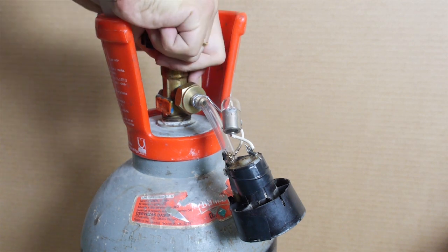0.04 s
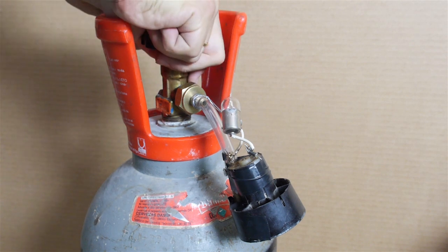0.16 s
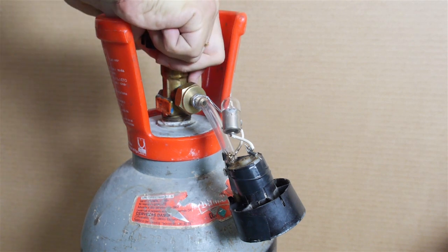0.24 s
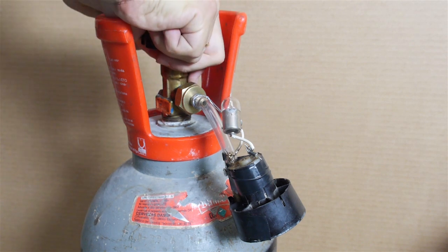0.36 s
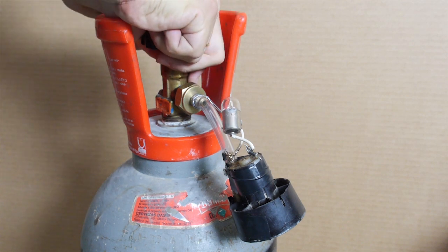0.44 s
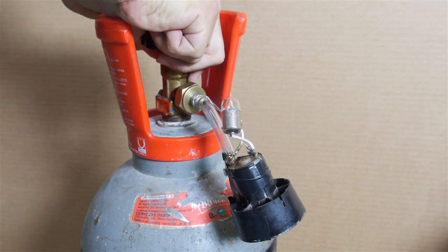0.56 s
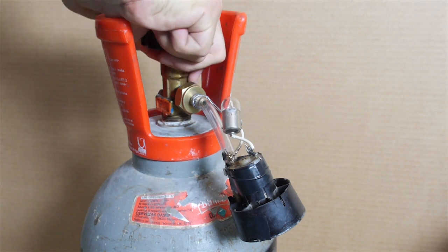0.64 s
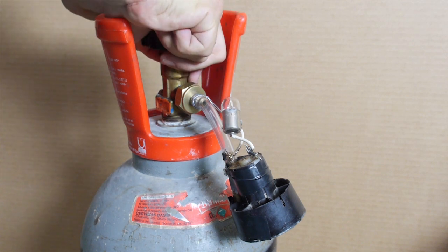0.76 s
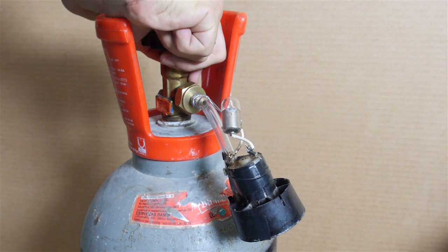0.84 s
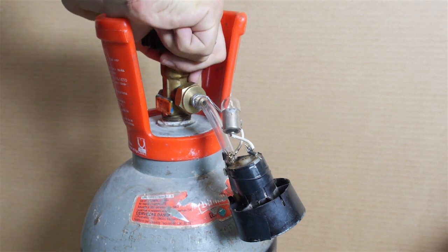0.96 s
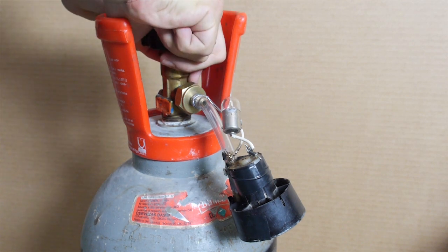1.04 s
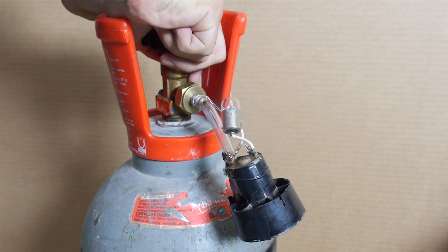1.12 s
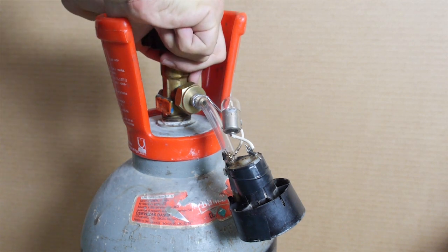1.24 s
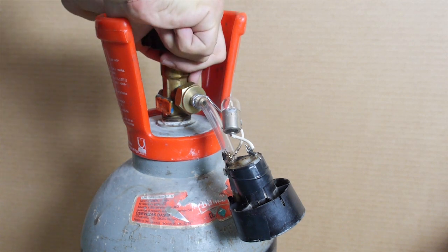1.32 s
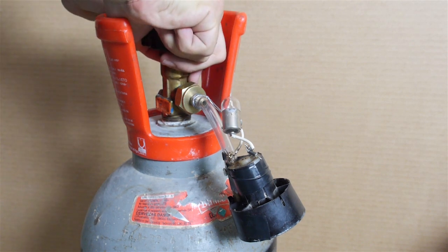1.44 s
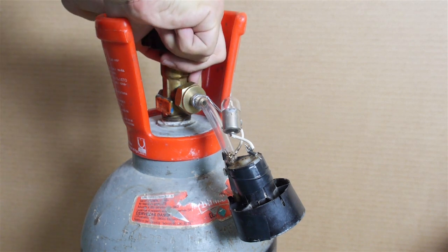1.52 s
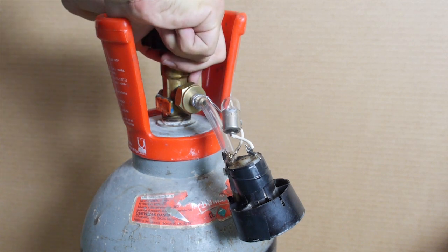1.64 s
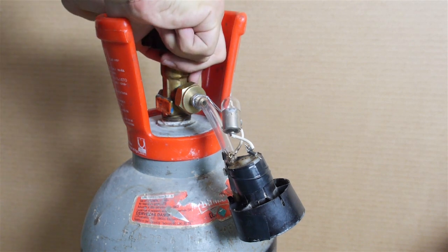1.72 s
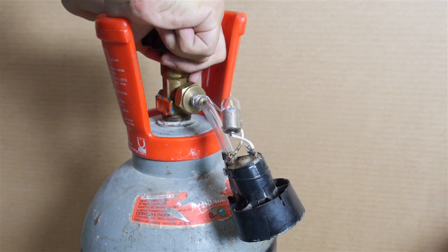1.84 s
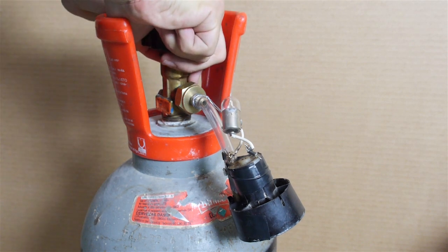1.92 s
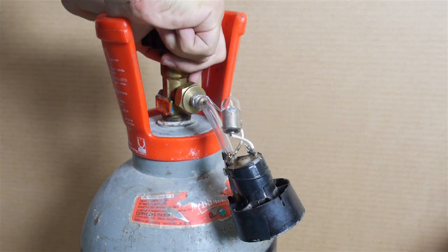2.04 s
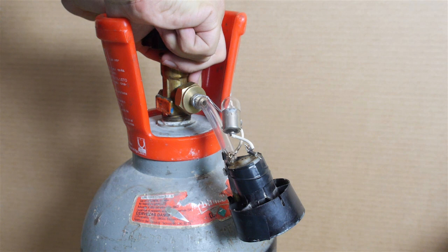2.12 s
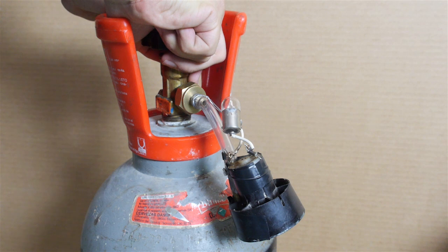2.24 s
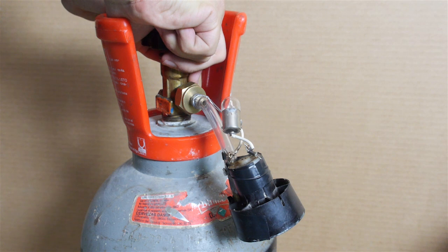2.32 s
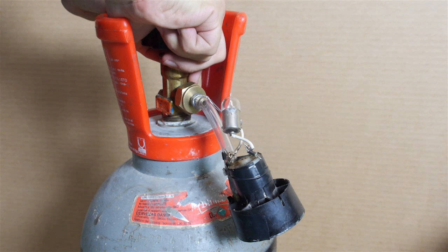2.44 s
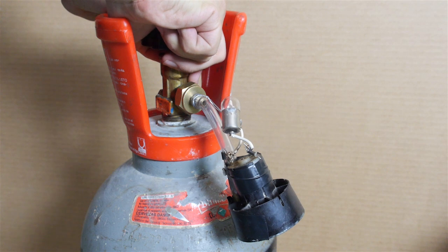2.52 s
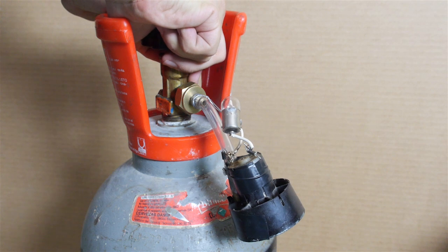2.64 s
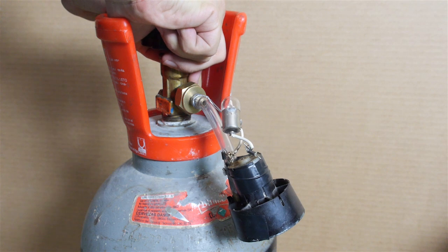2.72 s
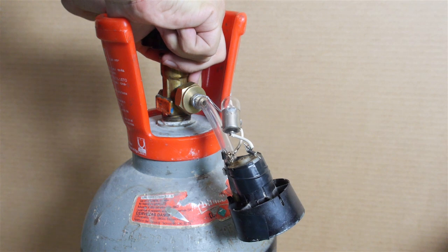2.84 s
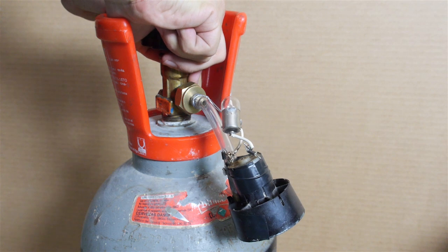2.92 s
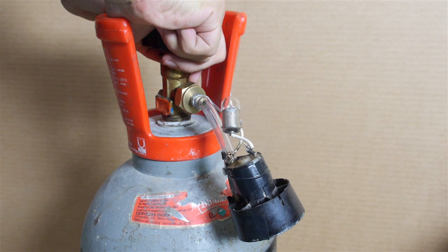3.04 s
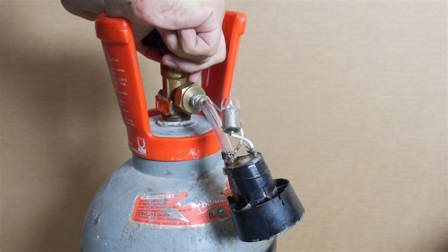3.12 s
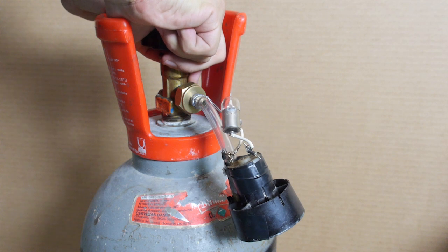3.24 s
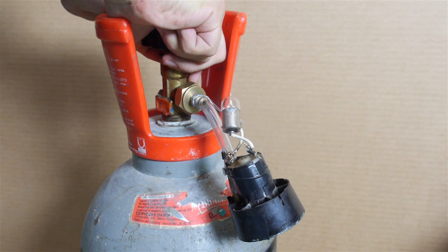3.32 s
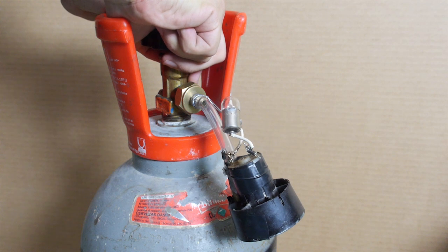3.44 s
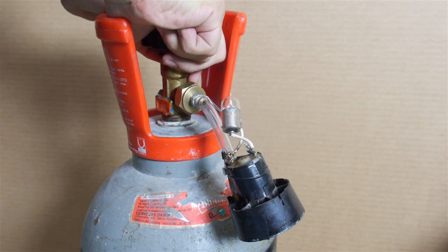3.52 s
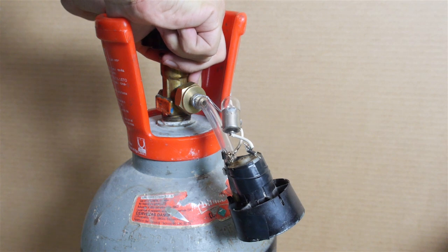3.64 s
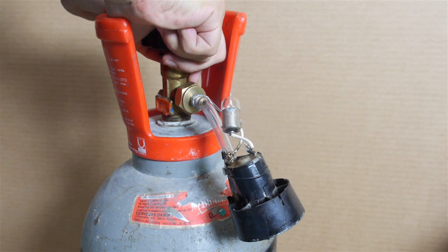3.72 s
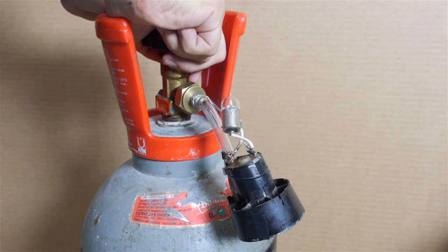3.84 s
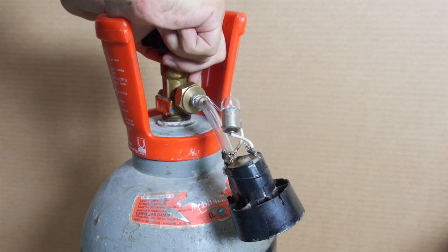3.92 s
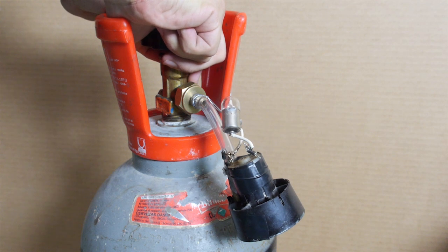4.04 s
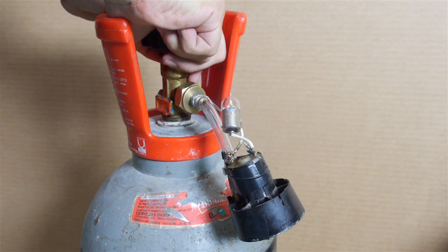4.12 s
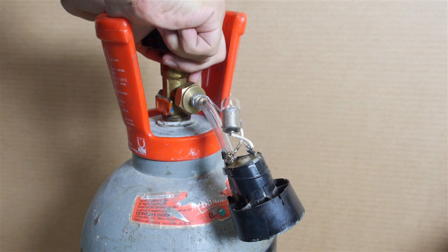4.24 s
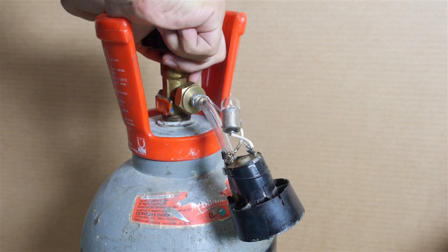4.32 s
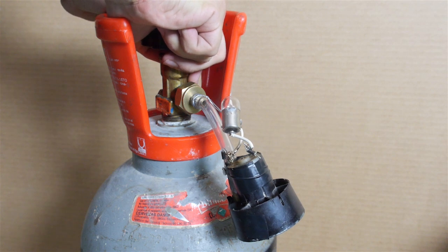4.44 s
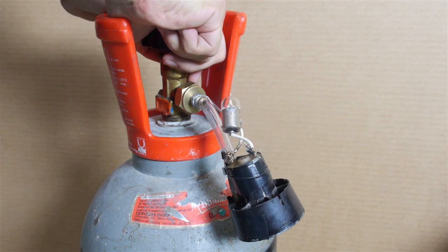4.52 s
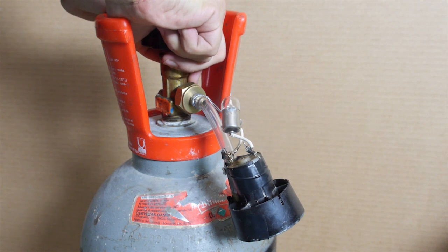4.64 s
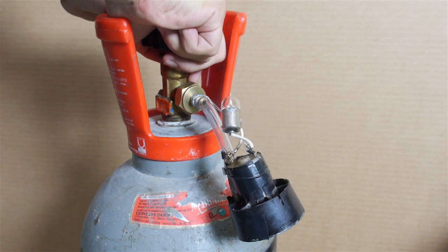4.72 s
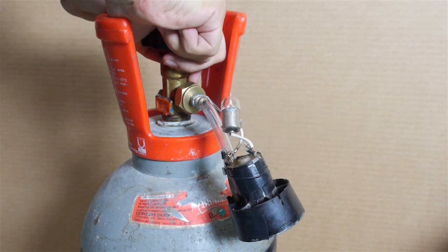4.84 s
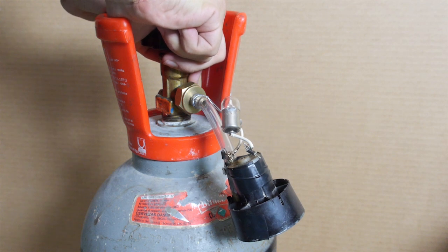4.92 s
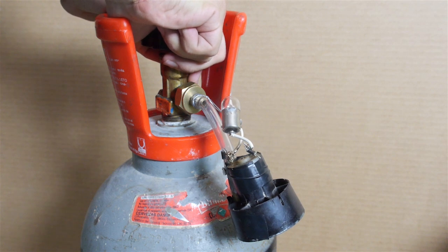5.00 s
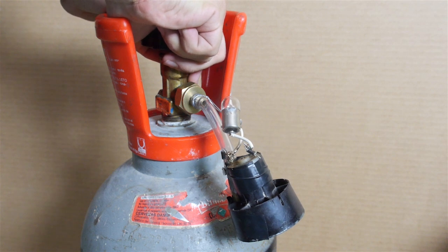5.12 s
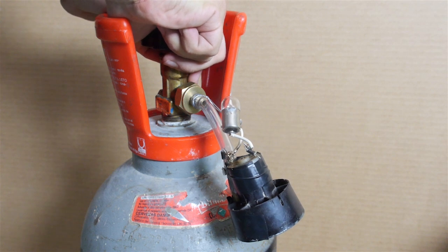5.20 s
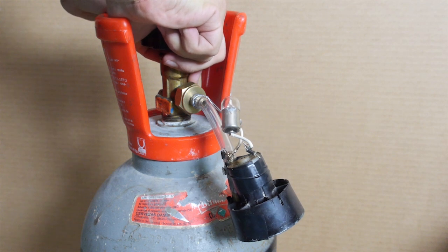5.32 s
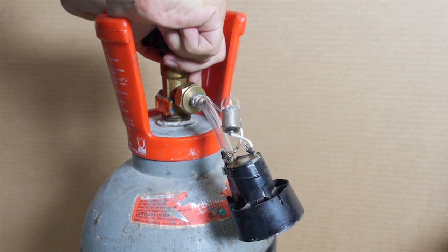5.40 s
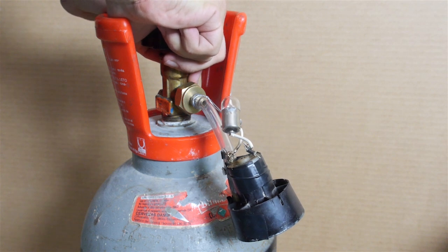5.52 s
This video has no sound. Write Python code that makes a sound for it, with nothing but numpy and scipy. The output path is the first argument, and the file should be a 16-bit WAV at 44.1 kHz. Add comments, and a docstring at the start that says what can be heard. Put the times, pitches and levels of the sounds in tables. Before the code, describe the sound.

Compressed air hisses from a cylinder valve, swelling in steps, then a small turbine rotor spins up to a rough buzz and climbing whine.

```python
"""Compressed air hisses through a hose into the plastic housing of a small turbine: shaped stereo noise.
A hand opens the valve of the gas cylinder in steps, with dry ticks; each step sets a new hiss level.
At about 2.6 s the hiss changes colour and the rotor spins up, levels off at a buzz, then climbs again
to a whine: harmonics of the shaft speed over chopped noise. Behind it lies a quiet room with a faint hum."""
import sys
import numpy as np
from scipy.fft import rfft, irfft, next_fast_len
from scipy.io import wavfile
from scipy.ndimage import map_coordinates

SR = 44100
rng = np.random.default_rng(int(sys.argv[2]) if len(sys.argv) > 2 else 0)


def to_wav(sig):
    """Store sig (one row per channel, or 1-D mono) as 16-bit WAV at the path in sys.argv[1].

    Samples outside -1..1 are clipped; the rate is SR.
    """
    pcm = np.clip(np.atleast_2d(sig), -1, 1) * 32767
    pcm = np.round(pcm).astype(np.int16)
    wavfile.write(sys.argv[1], SR, pcm.T)  # frames by channels


N = 245637

# Peaks and notches of hose and housing. Each row: centre in Hz, width in Hz,
# gain in dB for the early hiss, gain in dB for the late hiss.
DUCT_RESONANCES = [(1415, 236, 11, 12.5), (2024, 340, 10.5, 8.5), (2460, 110, 3.5, -6.5),
                   (2960, 110, 6.5, -1), (3056, 162, -4.5, -10.5), (3450, 130, 5.4, 3), (3827, 85, 7.5, 5),
                   (4004, 163, 6, 4), (4050, 31, -24, -16), (4178, 150, 7, 7.5), (4450, 165, 6, 1.2),
                   (4700, 28, -18, -11), (4970, 430, 8.5, 7.5), (5260, 150, -8, -9.5), (6320, 260, 3.5, 6),
                   (6900, 88, 4.5, -8), (7090, 305, -0.3, 5.5), (7600, 210, 7.5, -2.5),
                   (7680, 210, -5.5, 7.5), (8090, 510, 10.0, 6.5), (8420, 45, -9, -4),
                   (8620, 270, 8.5, 5.5), (9190, 98, 16.5, 5.5), (9160, 69, -13, 1), (9930, 410, 4.5, 6.5),
                   (10540, 160, 5, 5.5), (11300, 41, 9, 5), (11660, 86, 2, 4), (13083, 86, 5, -4),
                   (13609, 110, 4.1, 4)]
# Hiss spectra, early and late. Each row: frequency in Hz, relative density in dB per Hz.
EARLY_HISS = [(130, -51), (220, -28.5), (400, -32.5), (600, -25.5), (1100, -22.5), (2000, -19.5),
              (3000, -11.5), (4200, -4.5), (6000, -6.5), (8000, -14.5), (10500, -11.5), (13000, -15.5),
              (15600, -21.5)]
LATE_HISS = [(130, -40), (220, -25.5), (400, -26.5), (600, -22), (1100, -27), (2000, -15), (3000, 0.5),
             (4200, -0.5), (6000, -3), (8000, -8.0), (10500, -6), (13000, -6.5), (15600, -15.5)]
# Hollow undertone of a weak jet. Each row: frequency in Hz, relative density in dB per Hz.
HOLLOW_UNDERTONE = [(300, -28), (1100, -17), (1400, -3), (1750, -21), (2000, 7), (2300, -7), (2600, 0),
                    (3300, 0), (6000, -40)]
# Turns of the valve wheel. Each row: start in seconds, length in seconds,
# hiss level reached in dB, top-band level reached in dB relative to the hiss.
VALVE_STEPS = [(0.795, 0.013, -54.5, -10.5), (1.034, 0.045, -43.5, -9.7), (1.264, 0.067, -36.5, -2.8),
               (1.54, 0.2, -27.5, -3.2), (2.13, 0.086, -25, -4), (2.524, 0.15, -26, -2.5)]
SWELL_S, SWELL_WIDTH_S, SWELL_DB = 2.575, .045, 2  # brief swell of the hiss as its colour changes
SAG_DB_PER_S = 0.39  # slow fall of the hiss after the swell, as the hose pressure eases off

# Spurts of the rotor. Each row: start in seconds, first acceleration in turns per s per s,
# decay time constant in seconds.
ROTOR_SPURTS = [(2.665, 661.8, .261), (4.434, 123.8, 15.2), (5.282, 156.4, .292)]
CREEP_HZ_PER_S = 5.39
# Shaft orders. Each row: multiple of the shaft speed, relative level in dB.
SHAFT_ORDERS = [(1, -1.5), (2, -1), (3, 2.5), (4, 3.5), (5, 2.5), (6, 2), (7, 0), (8, 1.5), (9, 0),
                (10, -2), (11, -5.5), (12, -7.5), (13, -2), (14, -22)]
# Radiation of the shaken housing. Each row: frequency in Hz, gain in dB.
SHELL_RADIATION = [(100, -40), (135, -10), (180, -6), (265, -3.5), (340, -15), (400, -10), (520, -.5),
                   (680, -2), (1030, .5), (1180, -2), (1380, 3), (1540, 6), (1720, -2), (1900, 3),
                   (2120, 6), (2420, 0), (2780, 6), (3100, 1), (4500, 0)]
# Air churned by the blades. Each row: frequency in Hz, relative density in dB per Hz.
BLADE_CHURN = [(130, -37), (190, -37), (250, -23), (380, -14), (550, 0.5), (800, 12.5), (1150, 9.5),
               (1450, 13), (1750, -12), (2050, 17.5), (2450, -1), (2850, 1), (4500, 10.5), (9000, -9)]
# Shaking of the housing: level at cruising speed, slope per doubling of speed, slope with acceleration.
CRUISE_HZ = 180
SHAKE_DB, SHAKE_DB_PER_OCTAVE, STRAIN_DB_PER_HZ_PER_S = -47.5, 5, 0.0203
# A faster shaft favours the orders above the pivot: dB per order and doubling of speed.
BRIGHTEN_DB, PIVOT_ORDER = 0.5, 5
# Lines and churned air against the shaking, at cruising speed and per doubling of speed.
WHINE_DB, WHINE_DB_PER_OCTAVE = -9, 3.5
CHURN_DB, CHURN_DB_PER_OCTAVE = 0, -0.5

# Ticks of the valve wheel. Each row: start in seconds, level in dB before a 2 dB cut,
# ring frequency in Hz, share of crack.
WHEEL_TICKS = [(0.042, -56, 2400, .8), (0.051, -43, 1130, .3), (0.083, -52, 1170, .4),
               (0.255, -45.5, 1140, .4), (0.288, -52, 1100, .2), (0.438, -52, 1200, 1.1)]
# Quiet room. Each row: frequency in Hz, relative density in dB per Hz.
ROOM_SPECTRUM = [(15, -8), (30, 3), (70, 1), (130, -12), (250, -3), (340, -3), (1000, -3), (1500, -7.5),
                 (3300, -11.5), (4200, -6), (4500, -12), (5100, -10.5), (7000, -16.5), (15500, -26)]
ROOM_DB, LOW_BAND_DB = -69, -69.5
# Appliance hum. Each row: frequency in Hz, mean level in dB.
HUM_TONES = [(253, -72), (346, -69.5)]

# Stereo width of the noises. Each row: frequency in Hz, side relative to mid in dB.
SIDE_LEVEL = [(100, -20), (250, -10), (700, -6), (1300, -20), (2400, -30.5), (4400, -16), (8000, -10),
              (15000, -10.5)]
# Stereo balance. Each row: frequency in Hz, left minus right in dB.
LEFT_RIGHT_BALANCE = [(1000, 0), (4400, -.5), (8000, -1), (15000, -1.5)]
TOP_HZ = 15800


def hiss():
    """Turbulent air from the valve, stepped in level and brightness; its colour changes at about 2.56 s."""
    hiss_db, bright_db = flow()
    hz, width_hz, early_db, late_db = np.transpose(DUCT_RESONANCES)
    early = jet(EARLY_HISS, list(zip(hz, width_hz, early_db)), ripple_db=1.7)
    late = jet(LATE_HISS, list(zip(hz, width_hz, late_db)), ripple_db=2.1)
    # equal-power crossfade
    changed = ramp(2.56, 0.059)
    core, top = np.sqrt(1 - changed) * np.array(early) + np.sqrt(changed) * np.array(late)
    gusts = amp(hiss_db + 0.35 * wobble(25.42) + 0.49 * wobble(160))
    core_gain = amp(.5 + 0.11 * wobble(20))
    air = gusts * (core_gain * core + amp(bright_db) * top)
    # the undertone grows more slowly than the hiss
    undertone = noise(lambda f: along(HOLLOW_UNDERTONE, f))
    air += amp(-63.0 + 0.089 * (hiss_db + 58)) * undertone
    # in the late hiss an edge tone at the nozzle, a narrow noise band, flares irregularly
    edge = noise(lambda f: -20 * np.log10(1 + ((f - 6380) / 260) ** 2))
    flare = amp(1.6 * np.tanh(1.2 * wobble(35)))
    air += changed * amp(hiss_db - 11.0) * unit(edge * flare)
    start_s, length_s = VALVE_STEPS[0][:2]
    return ramp(start_s, length_s) * air


def flow():
    """Hiss and top-band levels in dB: each valve turn carries both to a new step; swell and sag add."""
    _, _, hiss_db, bright_db = VALVE_STEPS[0]
    for start_s, length_s, step_db, step_bright_db in VALVE_STEPS[1:]:
        turned = ramp(start_s, length_s)
        hiss_db = hiss_db + turned * (step_db - hiss_db)
        bright_db = bright_db + turned * (step_bright_db - bright_db)
    since_s = clock() - SWELL_S
    swell_db = SWELL_DB * np.exp(-(since_s / SWELL_WIDTH_S) ** 2)
    sag_db = SAG_DB_PER_S * np.maximum(since_s, 0)
    return hiss_db + swell_db - sag_db, bright_db


def jet(spectrum, resonances, ripple_db):
    """Turbulence coloured by the duct, as a core band and a top band of rms 1."""
    delays_s = rng.uniform(.002, .016, 14)

    def colour(hz):
        duct_db = sum(db / (1 + (2 * (hz - centre) / width) ** 2) for centre, width, db in resonances)
        # echoes off the cylinder and the backdrop comb the spectrum
        echoes = sum(np.cos(2 * np.pi * hz * delay_s) for delay_s in delays_s)
        comb = unit(np.tanh(unit(echoes)))
        return along(spectrum, hz) + duct_db + ripple_db * comb * np.clip(hz / 8000, 0, 1)

    air = noise(colour)
    core = filtered(air, lambda hz: 1 / (1 + (hz / 6800) ** 16))
    return unit(core), unit(air - core)


def rotor():
    """The unbalanced rotor shakes the housing at multiples of its speed and chops the air each turn."""
    speed_hz, push_hz_per_s = spin()
    octaves = np.log2(np.maximum(speed_hz, 1) / CRUISE_HZ)
    shake_db = SHAKE_DB + SHAKE_DB_PER_OCTAVE * octaves + STRAIN_DB_PER_HZ_PER_S * push_hz_per_s
    # the shaft runs less evenly while it first spins up
    unsteady = 0.0014 + 0.0246 * (1 - ramp(2.85, 0.33))
    turns = np.cumsum(speed_hz * (1 + unsteady * wobble(40))) / SR
    tone = np.zeros(N)
    for order, db in SHAFT_ORDERS:
        tilt_db = BRIGHTEN_DB * (order - PIVOT_ORDER) * octaves
        gain = amp(db + along(SHELL_RADIATION, order * speed_hz) + tilt_db)
        # one knock a turn keeps the orders loosely in step; play in the bearing roughens the higher ones
        phase = 2 * np.pi * order * turns + rng.normal(0, 0.81) + 0.027 * order * wobble(130)
        tone += gain * amp(2.0 * wobble(14)) * np.sqrt(2) * np.cos(phase)
    chop = amp(3.5 * np.cos(2 * np.pi * turns))
    churn = unit(chop * noise(lambda hz: along(BLADE_CHURN, hz)))
    # the lines stand out of the churning air as the shaft gathers speed
    whine = ramp(2.64, 0.27) * amp(WHINE_DB + WHINE_DB_PER_OCTAVE * octaves) * tone
    churned = ramp(2.69, 0.052) * amp(CHURN_DB + CHURN_DB_PER_OCTAVE * octaves) * churn
    return amp(shake_db) * (whine + churned)


def spin():
    """Rotor speed (turns per s) and acceleration: drag eats up each spurt, and a slow creep goes on."""
    t = clock()
    push = CREEP_HZ_PER_S * (t > ROTOR_SPURTS[0][0])
    for start_s, first, lag_s in ROTOR_SPURTS:
        push = push + first * (t > start_s) * np.exp(-np.maximum(t - start_s, 0) / lag_s)
    return np.cumsum(push) / SR, push


def ticks():
    """Short dry ticks as the hand takes up the valve wheel: a damped sine plus a noise crack."""
    out, t = np.zeros(N), np.arange(SR // 20) / SR
    for start_s, db, hz, snap in WHEEL_TICKS:
        # ring and crack fall 60 dB in 12 and 8 ms
        ring = .8 * np.sin(2 * np.pi * hz * t) * amp(-60 * t / .012)
        crack = snap * rng.standard_normal(len(t)) * amp(-60 * t / .008)
        out[round(start_s * SR):][:len(t)] += amp(db - 2) * (ring + crack)
    return filtered(out, lambda hz: 1 / (1 + (hz / 4500) ** 2))


def room():
    """Faint room noise, the hum of a distant appliance, and a low noise band fading from about 1.5 s."""
    hum = np.zeros(N)
    for hz, db in HUM_TONES:
        gain = amp(db + 0.79 * wobble(4.7)) * np.sqrt(2)
        hum += gain * np.sin(2 * np.pi * hz * clock() + 0.54 * wobble(3.9))
    low_points = [(70, -11), (120, 1.0), (170, -7.5), (260, -1), (500, -49)]  # Hz, dB per Hz
    low_band = (1 - ramp(1.48, 0.31)) * noise(lambda hz: along(low_points, hz))
    air = noise(lambda hz: along(ROOM_SPECTRUM, hz))
    return hum + amp(LOW_BAND_DB) * low_band + amp(ROOM_DB) * air


def noise(colour):
    """Stereo noise of rms 1; colour(Hz) shapes it in dB, with a weaker side signal for width."""
    mid = filtered(rng.standard_normal(N), lambda hz: amp(colour(hz)))
    side = filtered(rng.standard_normal(N), lambda hz: amp(colour(hz) + along(SIDE_LEVEL, hz)))
    return unit(np.array([mid + side, mid - side]))


def filtered(x, response):
    """x times a zero-phase response of frequency."""
    size = next_fast_len(N + 8192)
    return irfft(rfft(x, size) * response(np.fft.rfftfreq(size, 1 / SR)), size)[..., :N]


def wobble(rate_hz):
    """Smooth random curve, rate_hz knots per second."""
    return map_coordinates(rng.standard_normal(int(N * rate_hz / SR) + 4), [clock() * rate_hz])


def ramp(start_s, length_s):
    """Goes from 0 to 1 over length_s."""
    return np.clip((clock() - start_s) / length_s, 0, 1)


def clock():
    """Time of each sample in seconds."""
    return np.arange(N) / SR


def along(points, hz):
    """(Hz, value) points interpolated on a log-frequency axis."""
    f, v = np.transpose(points)
    return np.interp(np.log(hz + 1), np.log(f), v)


def unit(x):
    """Scaled to rms 1."""
    return x / np.sqrt(np.mean(x ** 2) + 1e-20)


def amp(db):
    """Decibels to gain."""
    return 10 ** (np.asarray(db) / 20)


def scene():
    """Sum of the sources, the treble leaning a little to the right."""
    sound = hiss() + rotor() + ticks() + room()
    return filtered(sound, lambda hz: amp(np.outer([.5, -.5], along(LEFT_RIGHT_BALANCE, hz))))


def record(dry):
    """The stereo image narrows to mono at about 2.5 s; nothing passes above TOP_HZ."""
    mid, side = (dry[0] + dry[1]) / 2, (dry[0] - dry[1]) / 2
    side = side * (1 - ramp(2.505, 0.016))
    return filtered(np.array([mid + side, mid - side]), lambda hz: hz < TOP_HZ)


dry = scene()
out = record(dry)
to_wav(out)
```